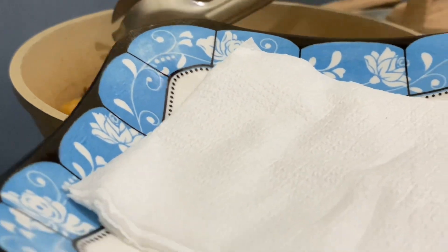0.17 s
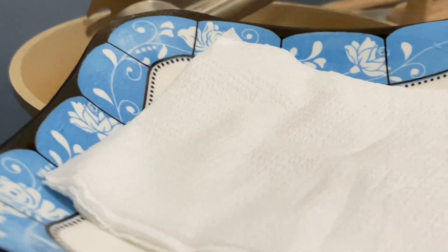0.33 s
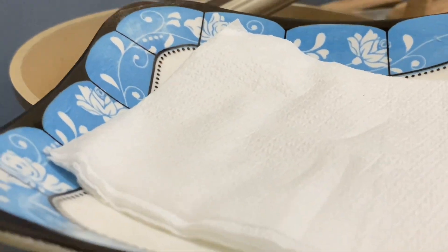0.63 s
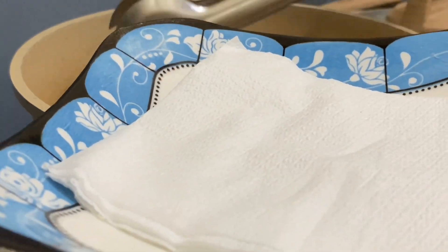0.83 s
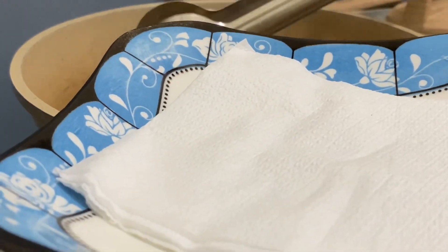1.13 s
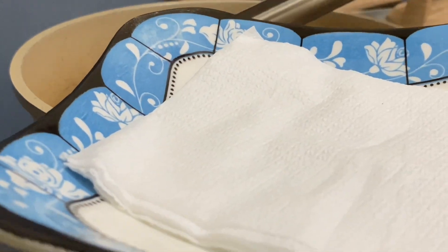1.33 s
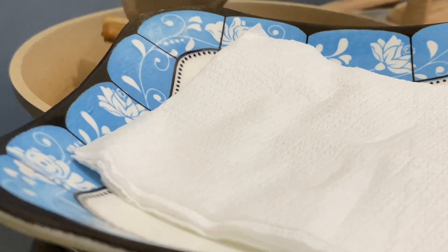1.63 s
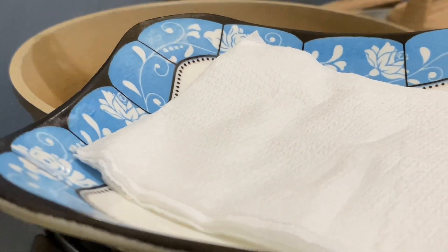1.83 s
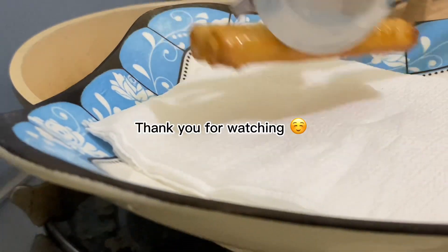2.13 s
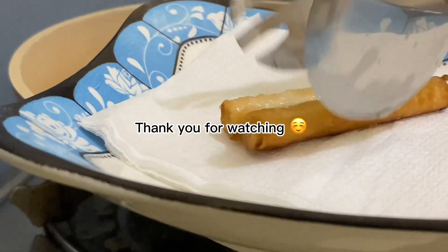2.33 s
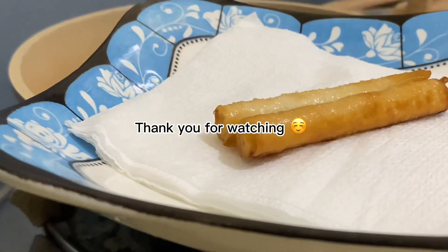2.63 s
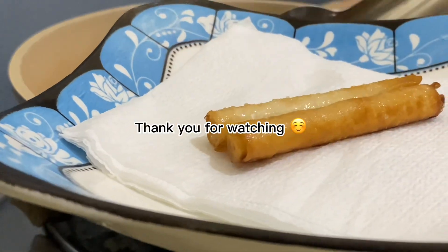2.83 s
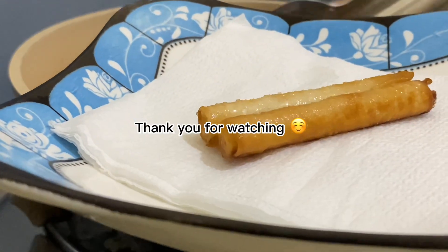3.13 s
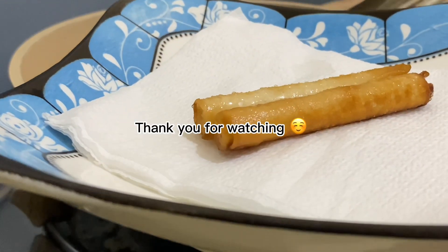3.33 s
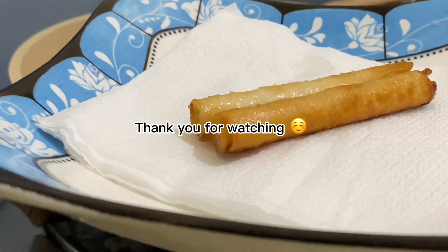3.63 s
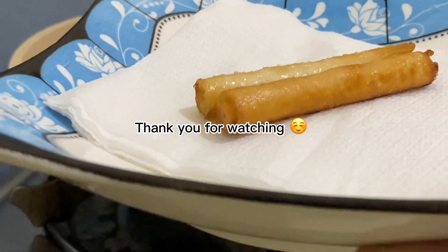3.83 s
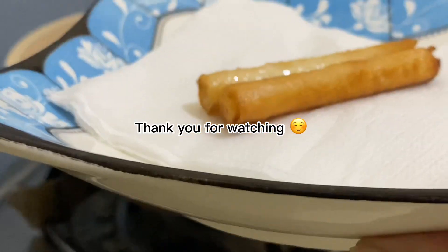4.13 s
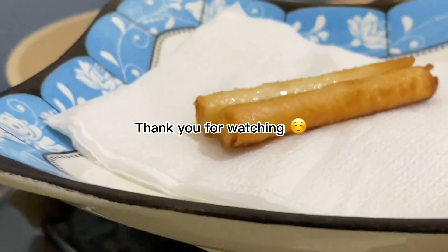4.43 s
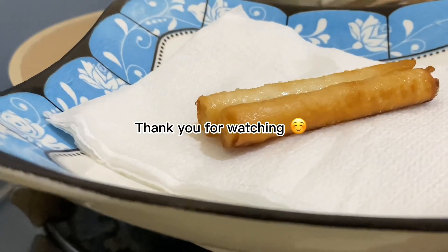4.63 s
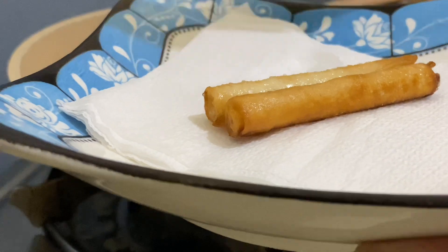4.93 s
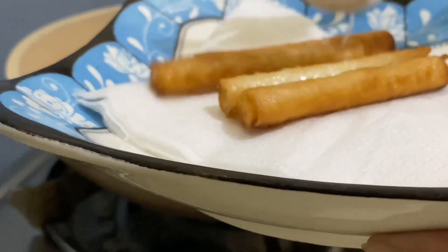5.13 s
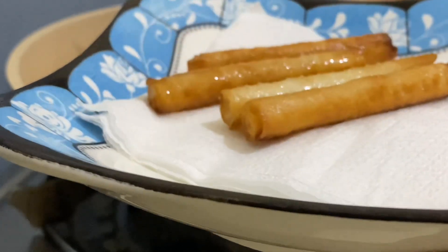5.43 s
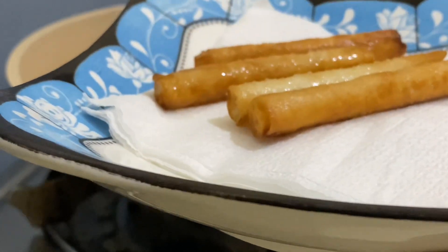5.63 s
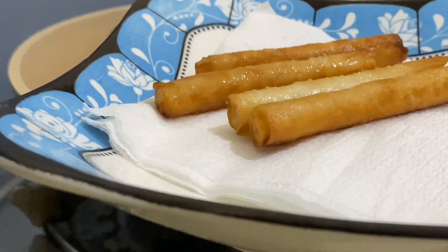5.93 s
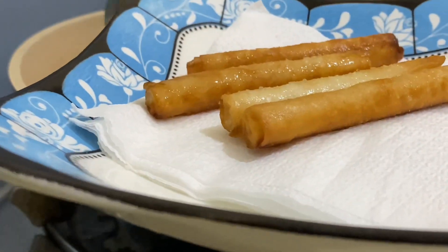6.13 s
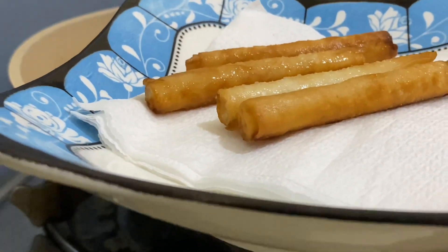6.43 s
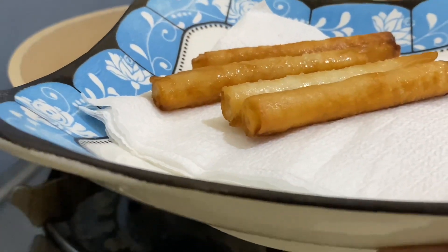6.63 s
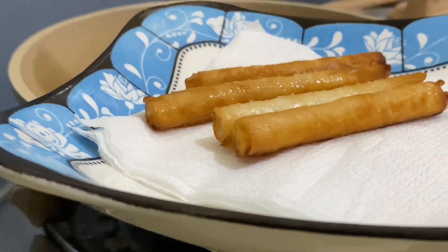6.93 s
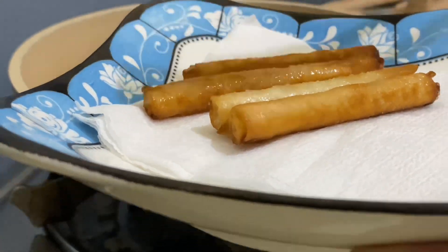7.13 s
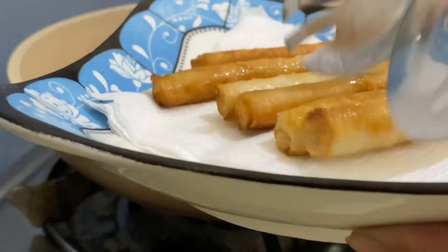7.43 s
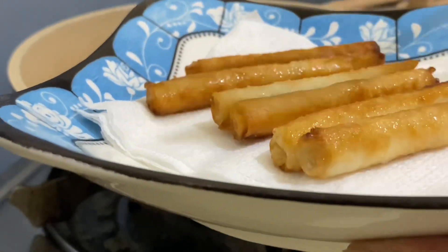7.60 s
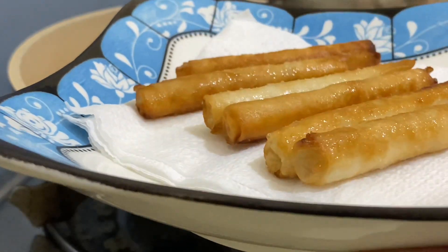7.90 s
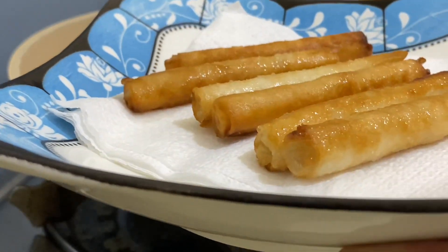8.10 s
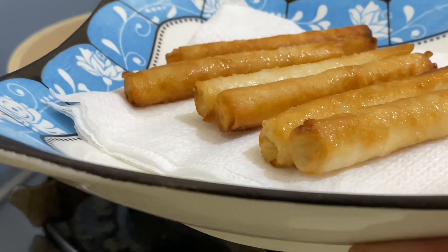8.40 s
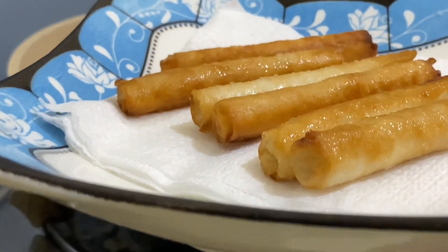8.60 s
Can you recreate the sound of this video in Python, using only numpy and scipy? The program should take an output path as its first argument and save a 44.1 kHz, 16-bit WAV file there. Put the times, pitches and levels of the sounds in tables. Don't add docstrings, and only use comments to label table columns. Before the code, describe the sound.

Someone lifts fried food with metal tongs: light ticks, grainy drags and damped clanks on a frying pan, its ring brief and choked by food and grip. Activity comes in clusters separated by quiet seconds, with the loudest blows scattered through the middle and near the end. Behind it a fridge hums steadily, a fan drones low, and hot oil hisses gently, slowly fading. Recorded close, in stereo, with short hard-room reflections.

```python
import sys
import numpy as np
from scipy import signal
from scipy.fft import rfft, irfft, next_fast_len
from scipy.io import wavfile
from scipy.ndimage import uniform_filter1d

SR = 44100
rng = np.random.default_rng(int(sys.argv[2]) if len(sys.argv) > 2 else 0)


def undo_db(level):
    steps = np.asarray(level, float) / 20
    return 10 ** steps


def materialize(psi):
    bounded = np.clip(np.atleast_2d(psi).T, -1, 1)
    quanta = np.round(bounded * 32767).astype(np.int16)
    wavfile.write(sys.argv[1], SR, quanta)


N = 386304


def evened(x):
    return x / np.sqrt(np.mean(x ** 2) + 1e-20)


def read(points, hz):
    f, value = np.transpose(points)
    return np.interp(np.log(hz + 1), np.log(f + 1), value)


def add(mix, s, sound):
    part = mix[..., round(s * SR):][..., :sound.shape[-1]]
    part += sound[..., :part.shape[-1]]


def coloured(x, points):
    size = next_fast_len(x.shape[-1])
    hz = np.fft.rfftfreq(size, 1 / SR)
    shaped = irfft(rfft(x, size) * undo_db(read(points, hz)), size)
    return evened(shaped[..., :x.shape[-1]])


def ring(modes, spread_db, apart, rise, twin_db=-6.0, lasting=1):
    hz, db, t60 = np.tile(np.transpose(modes), 2)
    t60 = t60 * lasting
    twin = np.arange(len(hz)) >= len(modes)
    t = np.arange(int(0.8 * np.clip(t60.max(), 0.05, 0.6) * SR)) / SR
    spot, detune, start, ear = rng.standard_normal((4, len(hz)))
    hz = hz * (1 + 0.0188 * detune * twin)
    swing = np.exp(np.outer(2j * np.pi * hz - np.log(1000) / t60, t))
    phase = 3 * start + apart * np.outer([-1, 1], ear)
    push = undo_db(db + spread_db * spot + twin_db * twin) * np.exp(1j * phase)
    x = (push @ swing).imag * (1 - np.exp(-t / rise))
    x = x * (1 + 2.4 * np.exp(-t / 0.0018))
    return x / abs(x).max()


def crack(colour, rise, fall):
    t = np.arange(2048) / SR
    x = coloured(rng.standard_normal(len(t)), colour)
    x = x * (1 - np.exp(-t / rise)) * np.exp(-t / fall)
    return x / abs(x).max()


def knock(contact_s):
    u = np.arange(512) / SR / contact_s
    return np.e * u * (2 - u) * np.exp(-u)


def clatter(low_hz, high_hz, t60):
    t = np.arange(int(0.8 * t60 * SR)) / SR
    both, own = rng.standard_normal(8192), rng.standard_normal((2, 8192))
    patch = [(low_hz * 0.84, -30), (low_hz, 0), (high_hz, -2.5), (high_hz * 2, -26), (high_hz * 4, -50)]
    x = coloured(both + own, patch)[:, :len(t)]
    t = t[:x.shape[1]]
    fade = undo_db(-60 * t / t60) * (1 + 1.3 * np.exp(-t / 0.0029))
    fade = fade * signal.windows.tukey(2 * len(t), 0.4)[len(t):]
    return x * fade * (1 - np.exp(-t / 0.00089)) / 6


def tone(hz, db):
    return np.sqrt(2) * undo_db(db) * np.sin(2 * np.pi * hz * np.arange(N) / SR)


# (frequency [Hz], density [dB per Hz])
HISS = [(160, -30), (270, -11), (361, 0.5), (400, -5), (603, -2.5), (691, -6.5), (752, 1), (1170, -3),
        (1460, -1.5), (3880, -7), (7550, -13), (9110, -15.5), (10600, -15.5), (13300, -15), (16000, -15.5)]
# (frequency [Hz], density [dB per Hz])
RUMBLE = [(25, -30), (50, -4.5), (100, -3.5), (140, -0.5), (185, -13.5), (230, -2.5), (270, -18.5),
          (330, -39)]
# (frequency [Hz], likeness [0 to 1])
SAME = [(60, 1), (200, 0.92), (400, 0.36), (800, 0.41), (1350, 0.25), (1800, 0.71), (2400, 1)]


def air():
    hiss_db, cooling_db_per_s, rumble_db = -50.5, -0.43, -48.5
    hz, t, z = signal.stft(rng.standard_normal((2, N)), SR, nperseg=1024)
    same = read(SAME, hz)[:, None]
    z = np.array([z[0], same * z[0] + np.sqrt(1 - same ** 2) * z[1]])
    patches = uniform_filter1d(rng.standard_normal(z.shape[1:]), 10, 0)
    patches = evened(uniform_filter1d(patches, 6, 1))
    noise = signal.istft(z * undo_db(1.1 * patches), SR, nperseg=1024)[1][:, :N]
    hiss = undo_db(hiss_db + cooling_db_per_s * np.arange(N) / SR) * coloured(noise, HISS)
    return hiss + undo_db(rumble_db) * coloured(noise, RUMBLE)


def refrigerator():
    return tone(119.9, -36.481)


# (time [s], level [dB])
DRONE = [(0.0, -60), (0.32, -40), (0.54, -54), (0.78, -41.5), (1.0, -49), (1.1, -46.5), (2.19, -37),
         (2.51, -52.5), (2.61, -40), (2.9, -50.5), (4.03, -41.5), (4.68, -57), (4.8, -46.5), (5.76, -45.5),
         (5.95, -38.5), (6.59, -48.5), (7.73, -42.5), (8.76, -49)]


def drone():
    waver_db, waver_s = 2.5, 0.3
    waver = evened(signal.oaconvolve(rng.standard_normal(N), np.hanning(int(waver_s * SR)), "same"))
    swell_db = np.interp(np.arange(N) / SR, *np.transpose(DRONE))
    return tone(76.1, swell_db + waver_db * waver)


# (time [s], tick [dB], lower modes [dB], middle modes [dB], top modes [dB])
TICKS = [
    (0.036, -47, -38.5, -64, -61),
    (0.0786, -33, -54, -56, -49),
    (0.139, -46, -47, -56, -73),
    (0.274, -36, -39, -48, -56),
    (0.83, -25, -33, -42, -53),
    (0.857, -25, -34, -50, -58),
    (3.566, -37, -59, -57, -58),
    (3.551, -51, -66, -65, -63.5),
    (3.874, -25, -52, -43, -58),
    (5.089, -47, -53, -57, -61),
]
# (frequency [Hz], level [dB], time to fall 60 dB [s])
TONGS_LOW = [(2390, -4, .04), (2655, 14.5, 0.09), (3480, -11, 0.08), (3880, -4, 0.039), (4350, -24, 0.025),
             (5550, 10.5, 0.078)]
TONGS_MID = [(6500, 0, .05), (7300, -4, .05), (7900, -4, .06)]
TONGS_TOP = [(9500, 1, 0.04), (9850, 6, 0.026), (11200, 1, 0.06), (12300, -3, .08)]
# (frequency [Hz], density [dB per Hz])
RASP = [(600, 6.5), (1500, -3.5), (3000, 1.5), (6000, -4), (9000, -9.5), (12000, -10), (16000, -16)]


def tongs():
    out = np.zeros((2, N))
    for s, db, low_db, mid_db, top_db in TICKS:
        add(out, s, undo_db(db - 3.5) * crack(RASP, 0.00085, 0.012))
        add(out, s, undo_db(low_db - 2.5) * ring(TONGS_LOW, 5.0, 0.05, 0.0027))
        add(out, s, undo_db(mid_db + 12.5) * ring(TONGS_MID, 1.2, 0.05, 0.00044))
        add(out, s, undo_db(top_db + 17.0) * ring(TONGS_TOP, 2.1, 0.05, 0.00045))
    return out


# (frequency [Hz], time to fall 60 dB [s])
ROOM = [(200, 1), (500, 0.27), (1400, 0.33), (3000, 0.28), (6000, 0.24), (12000, 0.45)]


def kitchen(x):
    taps = np.zeros((4, SR // 2))
    at = np.arange(160, SR // 2 - 20, 20) + rng.integers(0, 20, (4, (SR // 2 - 161) // 20))
    np.put_along_axis(taps, at, rng.choice([-1., 1.], at.shape), 1)
    hz, t, z = signal.stft(taps, SR, nperseg=256)
    tail = signal.istft(z * undo_db(-60 * t / read(ROOM, hz)[:, None]), SR, nperseg=256)[1]
    tail = tail + 0.74 * tail[::-1]
    wet = signal.oaconvolve(x[[0, 0, 1, 1]], tail / np.linalg.norm(tail[0]), axes=1)[:, :N]
    speed_hz = 34 * evened(uniform_filter1d(rng.standard_normal(N), 1300))
    blend = 2 * np.pi * np.cumsum(speed_hz) / SR
    return np.cos(blend) * wet[[0, 3]] + np.sin(blend) * wet[[1, 2]]


# (time [s], level [dB], fall [s])
CHATTER = [(.079, -42, .006), (.2735, -43, .008), (.4574, -40, .003), (.8225, -35, .007), (.831, -33, .008),
           (0.842, -40, .006), (.857, -34, .01), (.875, -42, .01), (.948, -40, .004), (3.566, -46, 0.0088),
           (3.7873, -27, .002), (3.801, -36, .003), (3.812, -36, .003), (3.832, -29, .004),
           (3.848, -32, .003), (3.861, -35, .003), (3.876, -33, .005), (4.013, -40, .003),
           (4.135, -42, .004), (5.114, -42, .004), (5.756, -37, .005), (8.709, -37, 0.0067)]


def chatter():
    out = np.zeros(N)
    for s, db, fall in CHATTER:
        add(out, s, undo_db(db) * crack(RASP, 0.0003, fall))
    return out


# (time [s], level [dB], frequency
# [Hz], time to fall 60 dB [s])
PINGS = [(0.081, -39, 11000, .03), (0.273, -39.5, 6860, 0.11), (3.566, -39, 11300, 0.042),
         (3.567, -49, 7850, 0.15), (3.744, -39, 1296, .2), (3.99, -39, 700, 0.34), (4.02, -33, 1343, 0.14),
         (4.045, -39, 710, 0.32), (4.105, -40, 722, 0.75), (4.16, -43, 1335, .2), (5.62, -33, 678, 0.19),
         (5.113, -36.5, 886, 0.039), (6.492, -26.5, 1090, 0.072), (6.294, -41, 668, .25),
         (8.707, -25, 1050, .04), (8.022, -32, 1040, .05), (6.492, -30, 3260, .05),
         (0.8305, -30.5, 10980, .03), (0.833, -40, 6700, .03), (0.836, -29.5, 2710, 0.041),
         (0.857, -42, 11500, 0.045), (0.859, -42, 3430, .15), (0.885, -40, 3730, 0.076),
         (0.917, -32.5, 1583, 0.055), (0.948, -36, 1950, 0.036), (1.14, -25, 5900, 0.045),
         (3.733, -40, 5700, 0.043), (3.743, -33, 3150, 0.023), (3.744, -31, 6000, .03),
         (3.7877, -27, 2124, 0.091), (3.789, -34, 4650, 0.026), (3.875, -28.5, 2320, 0.031),
         (3.875, -34.5, 4600, 0.044), (3.9957, -41, 2070, 0.044), (4.0132, -24.5, 1480, .03),
         (4.0134, -32, 2100, .04), (4.0716, -47, 2050, 0.045), (4.1344, -45, 4620, 0.044),
         (4.16, -42, 2270, .05), (5.114, -49, 1890, .03), (5.601, -31, 2040, 0.036),
         (5.613, -20.5, 5300, 0.035), (5.7546, -15, 3280, 0.011), (5.756, -33, 5850, 0.044),
         (5.756, -27, 2223, 0.095), (6.491, -22, 2065, 0.055), (8.0665, -35, 4650, 0.046),
         (8.708, -22, 2220, 0.035),
         (1.139, -12, 1463, 0.033), (1.1392, -13, 2000, .025), (1.1395, -26, 2900, 0.016),
          (1.147, -27, 2550, 0.027), (2.9545, -14, 3210, 0.023), (2.9545, -20, 2690, 0.028),
          (3.2505, -21, 3230, 0.015), (3.743, -17, 1530, .03), (3.7878, -27, 1000, 0.015),
          (3.7878, -30, 3300, .015), (3.789, -31, 5650, .02), (3.848, -29, 1440, .04),
          (3.881, -40, 2200, .02), (3.989, -37, 1500, .03), (5.1135, -37, 1150, .03),
          (6.133, -34, 1330, 0.033), (6.133, -36, 2450, .025), (6.134, -43, 900, .05),
          (6.256, -44, 2150, 0.047), (8.024, -20, 3200, .02), (8.0326, -11, 3270, 0.021),
          (8.033, -18, 2155, 0.056), (8.0665, -20, 2155, .04), (8.073, -31, 1400, .06),
          (0.386, -38, 2180, .02), (0.4574, -32, 1000, .03), (0.4574, -38, 2300, .015),
          (0.7552, -37, 1010, .03), (0.6265, -46, 1520, 0.018), (6.4912, -15, 1400, .018),
          (6.494, -26.5, 699, 0.14), (6.496, -30, 1335, .12), (5.7557, -22, 3280, 0.023),
          (0.9172, -32, 1850, .03), (1.1397, -24, 4150, 0.044), (4.016, -34, 1337, .14),
          (0.826, -39, 11100, .08), (8.036, -24, 720, .1), (2.965, -43, 376, 0.55), (8.036, -35, 376, 0.39),
          (3.76, -26, 1320, 0.13), (8.075, -34, 2126, 0.18)]


def pings():
    out, t = np.zeros(N), np.arange(12000) / SR
    for s, db, hz, t60 in PINGS:
        note = np.sin(2 * np.pi * hz * t) * (1 - np.exp(-t / 0.00047))
        add(out, s, undo_db(db - 60 * t / t60) * note)
    return out


# (time of firmest grip [s], release [s], base rub [dB], wall rub [dB], rasp [dB])
DRAGS = [(.088, 0.25, -46.5, -49, -49), (.3, 0.55, -44.5, -64, -47.5), (.4, 0.29, -52, -44, -42),
         (.47, 0.051, -37, -38.5, -50), (.66, 0.27, -50.5, -69, -45.5), (.73, .04, -52, -59, -51),
         (.81, 0.08, -38, -46, -50), (.832, 0.092, -45, -55, -37), (0.944, 0.049, -32.5, -27.5, -41),
         (3.8, 0.21, -32.5, -28, -31.5), (4.0, 0.15, -44, -33, -49), (4.142, 0.13, -40.5, -39, -41),
         (4.6, 0.19, -48.5, -45.5, -52), (4.72, 0.045, -49, -64, -64), (5.114, 0.074, -63, -66, -43.5),
         (5.68, 0.089, -53, -31, -42), (5.745, 0.17, -38, -35, -38.5), (6.1, 0.27, -62, -65, -46),
         (6.316, 0.15, -44.5, -47, -55), (6.53, 0.086, -34.5, -33.5, -51), (8.49, 0.15, -42.5, -44, -58)]


def strokes():
    grip_s, fall_db = 0.063, 21
    s, release, *levels = np.transpose(DRAGS)
    t = np.arange(0, N + 64, 64) / SR
    late = t - s[:, None]
    shape = -fall_db * np.maximum(-late / grip_s, late / release[:, None])
    return [np.interp(np.arange(N) / SR, t, np.max(db[:, None] + shape, axis=0)) for db in levels]


def slips(per_s, modes):
    train = rng.standard_normal(N) * (rng.random(N) < per_s / SR)
    body = np.zeros((2, SR // 4))
    for family, db in modes:
        add(body, 0, undo_db(db) * ring(family, 0.48, 0.38, 0.002))
    body = body * undo_db(-60 * np.arange(SR // 4) / SR / 0.2)
    return train / train.std(), body / np.linalg.norm(body[0])


# (frequency [Hz], level [dB], time to fall 60 dB [s])
DEEP = [(376, -9, 0.49), (417, -4, 0.17), (454, -7.5, 0.43), (526.6, -6.5, 0.31)]
BELL = [(601, -20.5, 0.47), (665.6, -4.5, 0.17), (733, -9.5, 0.19), (746.5, -10, 0.16), (845, -15.5, 0.13),
        (1032, -16.5, 0.12)]
CLANK = [(1180, -12, .07), (1332, 0, .088), (1450, -3, .04), (1490, -12, .07), (1570, -10, .05)]
BRIGHT = [(1873, -4, .09), (2036, -5, .11), (2126, 0, .11), (2200, -4, .05), (2320, -9, .1),
          (2690, -10, .05)]


def drags():
    deep_db, bell_db, rasp_db = strokes()
    grains = rng.laplace(size=N) * (rng.random(N) < 7000 / SR)
    out = undo_db(rasp_db - 6.0) * coloured(grains, RASP)
    rubs = [(deep_db - 3.0, [(DEEP, 0)]),
            (bell_db - 7.0, [(BELL, 0), (CLANK, -7.5), (BRIGHT, -9.5)]),
            (rasp_db - 20, [(TONGS_LOW, 0)])]
    for db, modes in rubs:
        train, body = slips(400, modes)
        out = out + signal.oaconvolve((undo_db(db) * train)[None], body, axes=1)[:, :N]
    return out


# (time [s], tick [dB], clatter [dB], spot [base 0 to rim 3], damping [dB per step away])
NUDGES = [(0.0929, -48, -46, 2, 3), (0.298, -43, -51, -3, 2), (0.386, -40, -40.5, -0.5, 1.5),
          (0.419, -38, -34, -0.5, 5), (0.4567, -21, -36, 0.5, 5), (0.627, -40, -32.5, 5, 4),
          (0.7562, -22, -27.5, 0.5, 11), (0.8277, -19, -26, 1, 25), (0.9164, -27, -22, 1.13, 11.5),
          (0.9477, -27, -39, 1, 12), (3.8303, -38, -35, -5, 18), (3.8537, -40, -38, 2.5, 0),
          (4.136, -36, -48, -7, 9), (4.6022, -49, -43, 0, 14), (5.1132, -30, -34.5, 0.5, 17),
          (6.133, -23.5, -35, 1.5, 9), (6.2011, -49, -36, -1.5, 4), (6.2562, -32, -33, -3, 6),
          (8.4754, -43, -49, 3, -1), (8.5714, -50, -43, -1.5, 5.5)]
# (rising edge [Hz], falling edge [Hz], time to fall 60 dB [s])
CLATTER = [(322, 550, 0.28), (690, 1080, 0.077), (1270, 1100, 0.072), (2520, 7000, 0.064)]
# (frequency [Hz], density [dB per Hz])
CRACK = [(200, -9), (500, -8.5), (1300, -7), (3000, -2), (4700, -15), (6600, -13), (9000, -22),
         (12000, -26), (16000, -38)]


def nudges():
    out = np.zeros((2, N))
    for s, tick_db, force_db, spot, damping in NUDGES:
        levels = force_db - damping * abs(np.arange(len(CLATTER)) - spot)
        add(out, s, undo_db(tick_db - 10.5) * crack(CRACK, 0.00074, 0.0043))
        add(out, s, undo_db(tick_db - 23.0) * knock(0.00018))
        for db, patch in zip(levels, CLATTER):
            add(out, s, undo_db(db + 8.5) * clatter(*patch))
    return out


# (time [s], level [dB], frequency [Hz], time to fall 60 dB [s])
THUMPS = [(0.389, -36.5, 221, 0.21), (.93, -42, 219, 0.32), (1.146, -37.5, 237, 0.15),
          (2.959, -38, 227, 0.16), (3.254, -39, 239.3, 0.55), (3.291, -40, 376, 0.73),
          (3.747, -35, 218.6, 0.3), (3.801, -39.5, 285.6, 0.61), (4.12, -37.5, 236.5, 0.23),
          (5.617, -35, 228, 0.21), (5.722, -30.5, 454, 0.39), (5.761, -48, 325, 0.81),
          (6.299, -38.5, 232, 0.17), (6.494, -37, 277, 0.11), (8.03, -35.5, 236.3, 0.6),
          (8.04, -40, 290, 0.18), (8.066, -30, 376, 0.57), (8.474, -45, 292, 0.18),
          (5.114, -48, 1193, 0.23), (5.81, -38, 657, 0.27)]


def thumps():
    out = np.zeros((2, N))
    for s, db, hz, t60 in THUMPS:
        add(out, s, undo_db(db) * ring([(hz, 0, t60)], 0, 0.34, 0.0069, twin_db=-5.0))
    return out


# (time [s], force [dB], wall modes [dB], rim modes [dB], hardness [dB])
BLOWS = [(1.1382, -17.5, -5, 1, -1), (2.954, -18, -9, -0.5, 3), (3.2499, -17, -4.5, -1.5, 0.5),
         (3.7422, -19, -7.5, -7.5, -5), (3.7875, -31, -2.5, 4.5, -15), (3.9884, -30.5, -16, -24, -28),
         (4.0126, -32.5, -4, -25, -26), (4.0716, -32.5, -7.5, -7.5, -20), (4.1831, -36, -18, -13, -17),
         (5.6122, -15.5, -7.5, 2.5, -3.5), (5.7264, -37, -2.5, 1, -20), (5.7548, -32, 3, 4, 15),
         (6.2929, -39.5, -16.5, -20, -11), (6.4903, -23, -4, 1.5, 2.5), (6.5717, -56.5, -1, 21, 4),
         (8.0234, -27.5, 6, 16, 7), (8.0326, -19.5, -4, -9, 8), (8.0663, -33, 4.5, 8, -11),
         (8.707, -22, -6, -6, -8.5)]
# (crack [dB], base [dB], length of the wall, rim and hard rings against their usual
LANDINGS = [(7, 3, 0.64), (-0.5, -3, 1.03), (0, -3, 0.8), (5.5, 2.5, 0.97), (-2, -8, 1.9), (2, -2, 1),
            (1, 6, .8), (-2, -5, 0.69), (3, 7, 1.4), (1.3, -4, 0.42), (-14, -3, 1.3), (-4, 11, 0.69),
            (6, 8, 1.1), (1, 1, 0.99), (0.1, 0, 0.71), (-1, 4, 0.85), (4.5, 2.5, 0.83), (-1, -1, 0.92),
            (-6, -3.5, 0.91)]
LOOSE = [-1, -1.5, -1, -3, 2, -2, 0, -3, -2, 0.5, 6.5, 0.5, 0, 0.5, 3, -1, -3, 1, 0.5]
# (frequency [Hz], level [dB], time to fall 60 dB [s])
BITE = [(3030, -9, .045), (3240, 0, .026), (3420, -4, .03), (3730, -15, .07), (4148, -19, .09),
        (4650, -20, .05), (5350, -15, .035), (6500, -18, .03)]


def pan():
    out = np.zeros((2, N))
    for (s, bell_db, wall, rim, hard), (crack_db, base_db, free), loose_db in zip(BLOWS, LANDINGS, LOOSE):
        clank_db, bright_db, bite_db = bell_db + wall, bell_db + rim, bell_db + hard
        deep_db = bell_db + base_db - 9.5 + 0.2 * (bell_db + 8.5)
        contact_db = (clank_db + bright_db) / 2 + crack_db
        add(out, s, undo_db(contact_db + 7.5) * crack(CRACK, 0.0018, 0.0039))
        add(out, s + 0.00115, -undo_db(contact_db + 1.5) * knock(0.000098))
        add(out, s, undo_db(deep_db + 2.5) * ring(DEEP, 1.4, 0.59, 0.01))
        add(out, s, undo_db(bell_db + 1.5) * ring(BELL, 1.5, 0.55, 0.006))
        add(out, s, undo_db(clank_db + 9.5) * ring(CLANK, 1.0, 0.99, 0.0095, lasting=free))
        add(out, s, undo_db(bright_db - 2.5) * ring(BRIGHT, 5.2, 0.14, 0.0069, lasting=free))
        add(out, s, undo_db(bite_db + 0.5) * ring(BITE, 1.5, 0.12, 0.0005, lasting=free))
        add(out, s, undo_db(clank_db + loose_db + 8.5) * clatter(640, 2660, 0.25))
        add(out, s, undo_db(bright_db + loose_db - 4.0) * clatter(1650, 6200, 0.28))
        add(out, s, undo_db(bell_db - 2.5) * clatter(337, 1000, 0.15))
    return out


def scene():
    metal = pan() + nudges() + tongs() + drags() + pings()
    low = thumps()
    echo = undo_db(-7.0) * kitchen(metal + 0.28 * low)
    return metal + low + echo + air() + refrigerator() + drone() + chatter()


def top_cut(x):
    return signal.sosfilt(signal.butter(12, 16970, fs=SR, output="sos"), x)


# (frequency [Hz], level [dB])
BALANCE_DB = [(60, 1.5), (150, 2.2), (250, 3.5), (380, 5.5), (550, .5), (950, -.3), (2000, 0)]
# (frequency [Hz], lag [turns])
LAG = [(7500, .025), (7650, .13), (8250, .25), (9050, .5), (10000, .75), (11050, 1), (12200, 1.25),
       (13350, 1.5), (14350, 1.77), (14700, 1.96)]
# (frequency [Hz], density [dB per Hz])
FAINT = [(1850, -130), (1950, -102), (2700, -103), (7000, -104), (7300, -111), (9700, -111), (10300, -109),
         (11700, -108), (12500, -110), (15750, -109), (15850, -92), (16900, -92), (17000, 0)]


def record(dry):
    ceiling, masked_db = 0.75, -7.5
    rounded = ceiling * np.tanh(dry / ceiling)
    hz, t, z = signal.stft(rounded, SR, nperseg=1024, scaling="psd")
    z = z * undo_db(np.array([0.5, -0.5])[:, None] * read(BALANCE_DB, hz))[..., None]
    mid, side = (z[0] + z[1]) / 2, (z[0] - z[1]) / 2
    turn, treble = np.pi * read(LAG, hz)[:, None], (hz > 2600)[:, None]
    side = np.where(treble, 1j * mid * np.sin(turn), side)
    mid = np.where(treble, mid * np.cos(turn), mid)
    power = uniform_filter1d(abs(np.array([mid, side])) ** 2, 14, 1)
    power = uniform_filter1d(power, 2, 2)
    heard = power > undo_db(2 * read(FAINT, hz))[:, None]
    unmasked = power > undo_db(2 * masked_db) * power.sum(0)
    heard = heard & (unmasked | (hz < 7000)[:, None])
    mid, side = mid * heard[0], side * heard[1]
    ports = signal.istft(np.array([mid + side, mid - side]), SR, nperseg=1024, scaling="psd")[1][:, :N]
    return top_cut(ports)


dry = scene()
out = record(dry)
materialize(out)
```